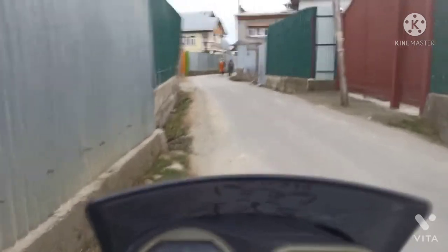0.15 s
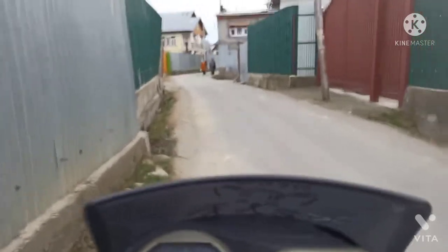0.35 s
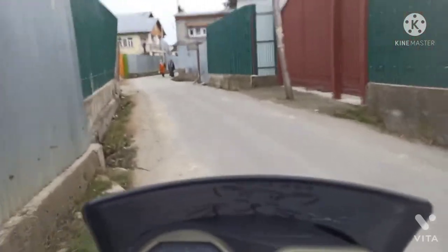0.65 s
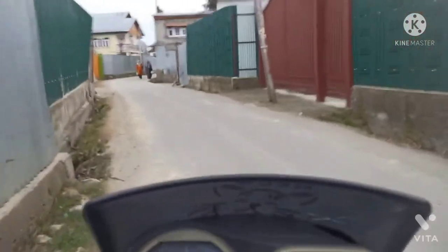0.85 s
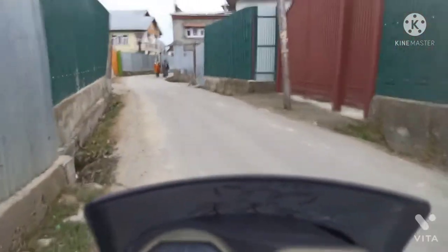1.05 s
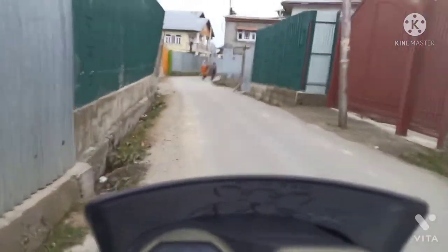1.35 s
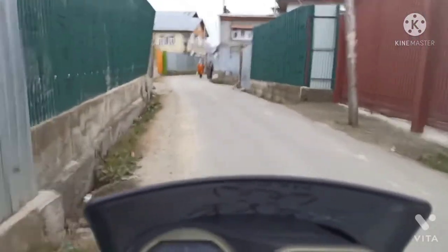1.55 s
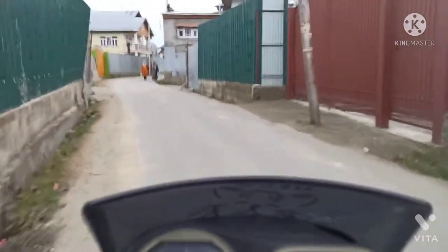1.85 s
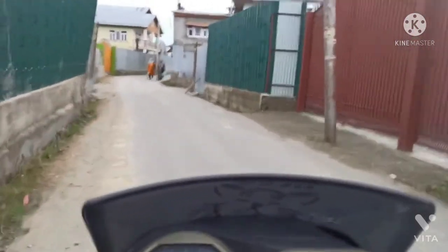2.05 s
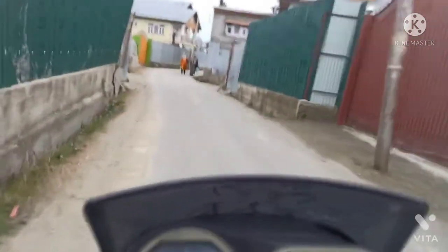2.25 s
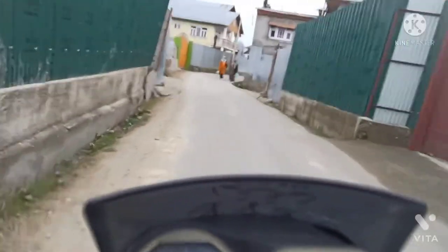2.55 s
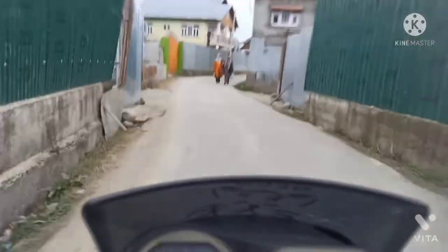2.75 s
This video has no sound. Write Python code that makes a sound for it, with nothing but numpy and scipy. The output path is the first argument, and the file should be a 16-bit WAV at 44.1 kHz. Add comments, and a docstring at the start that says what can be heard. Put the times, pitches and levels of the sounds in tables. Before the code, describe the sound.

A scooter engine starts, heard close from the saddle. Slow putts sound over a soft starter whir for the first half second. The engine picks up unevenly with a few metallic knocks, then revs to a peak around 1.6 seconds with ticking and an airy intake whistle. From about 2 seconds it settles into a steady, thumping putter with buzzing panels, stopping dead at about 2.7 seconds.

```python
"""A single-cylinder scooter engine starts and pulls away, heard from the saddle.
It catches in uneven putts, revs up and settles under load. Each firing thumps the exhaust
and rings the body panels; the intake whistles, gas puffs, valves tick and the casing buzzes.
Underneath, the starter whirs for the first half second. At the end the sound stops dead."""
import sys
import numpy as np
from scipy import signal
from scipy.fft import rfft, irfft, next_fast_len
from scipy.io import wavfile

SR = 44100
rng = np.random.default_rng(int(sys.argv[2]) if len(sys.argv) > 2 else 0)


def materialize(psi):
    """Save the field psi as 16-bit PCM at rate SR to the path in sys.argv[1].

    A 1-D psi becomes a single channel; in a 2-D psi each row is a channel.
    """
    bounded = np.clip(np.atleast_2d(psi).T, -1, 1)
    quanta = np.round(bounded * 32767).astype(np.int16)
    wavfile.write(sys.argv[1], SR, quanta)


N = 127890
TIME = np.arange(N) / SR
CRUISE_RATE = 20   # firings per second
LEAD_PERIODS = 3 / 4   # pressure builds early: resonances start this far ahead of the firing


def exhaust_boom(cycle, rate, force_db):
    """Each firing swells and dies in the silencer's low resonance, higher and tighter at speed."""
    out = np.zeros(N)
    for i in passes(cycle):
        speed = rate[i] / CRUISE_RATE
        hz = 97.9 + 20.2 * speed ** 2.03
        rise_s = 0.012 / speed ** 0.17
        near = slice(max(i - SR // 50, 0), i + SR // 10)
        age = np.maximum(TIME[near] - TIME[i] + LEAD_PERIODS / hz, 0)
        swell = (age / rise_s * np.exp(1 - age / rise_s)) ** 2.86
        out[near] += from_db(force_db[i] - 3.5) * swell * np.sin(2 * np.pi * hz * age)
    return out


def pressure_front(cycle, effort_db, punch_hz=206, punch_s=0.0018, crack_s=0.003):
    """A hard firing bursts out as a steep pressure front: a low punch with a bright crack."""
    punch, crack = np.zeros(N), np.zeros(N)
    for i in passes(cycle):
        near = slice(max(i - SR // 50, 0), i + SR // 50)
        age, gain = TIME[near] - TIME[i], from_db(effort_db[i])
        punch[near] -= gain * bell(age, punch_s) * np.cos(2 * np.pi * punch_hz * age)
        crack[near] += gain * bell(age, crack_s)
    return from_db(-17.5) * punch + from_db(-27.5) * crack * (noise(GAS_EQ) + noise(TICK_EQ))


# Ringing modes of the exhaust pipe and panels: f/Hz, level/dB, t60/s
BODY_MODES = [(165.4, -22, 0.26), (258.8, -17.5, .15), (297, -20.5, 0.044), (386, -23, 0.11),
              (470, -36.5, 0.12), (642.2, -26, 0.13), (879, -29, 0.15), (1240, -38.5, 0.24)]

def body_ring(cycle, throttle_db, spread_db=2.2):
    """The blow of each firing rings the pipe and panels, harder with open throttle."""
    hits, out = passes(cycle), 0
    for hz, db, t60 in BODY_MODES:
        hit_db = db + throttle_db[hits] + spread_db * rng.standard_normal(len(hits))
        onsets = np.maximum(hits - int(LEAD_PERIODS / hz * SR), 0)
        out = out + ring(clicks_at(onsets, hit_db), hz, t60)
    return out


# Colour of the loose panels: f/Hz, level/dB
PANEL_EQ = [(40, -18), (90, -3.5), (200, 5), (380, 3), (550, -4.5), (900, -8.5), (1400, -18.5), (2500, -22),
            (4600, -27), (5100, -26.5), (6600, -19), (7600, -14), (9000, -37)]

def loose_panels(cycle, throttle_db, t60=0.19):
    """Loose panels answer every firing with the same dense, short ring."""
    hits = passes(cycle)
    tail = noise(PANEL_EQ) * from_db(-22.5 - 60 * TIME / t60)
    return signal.fftconvolve(clicks_at(hits, throttle_db[hits]), tail)[:N]


# Intake whistle automation: t/s, f/Hz, level/dB, pulsing/0-1
WHISTLE = [(1.3, 1134, -38.5, 0.23), (1.44, 1110, -37, 0.8), (1.49, 1109, -22, 0.3), (1.65, 1170, -19, 0.3),
           (1.82, 1132, -21, 0.37), (1.98, 950, -19, 0.1), (2.25, 848, -27.5, 0.77),
           (2.64, 913.5, -22, 0.72)]
# Where each gulp of air peaks: t/s, position/cycles after the firing
GULP_TIMING = [(1.9, -.27), (2.35, -0.022)]

def intake(cycle, width_hz=136):
    """A whistle, part clear and part airy, that restarts and bends upward with each gulp of air."""
    hz, db, pulsing = automate(WHISTLE)
    at, = automate(GULP_TIMING)
    gulp = stroke(cycle, at, span=.14, floor=0)
    pitch = hz * (1 + .15 * pulsing * (gulp - .5))
    turns = np.cumsum(pitch) / SR
    gulp_starts = np.diff(np.floor(cycle - at + .5), prepend=0) > 0
    turns -= np.maximum.accumulate(turns * gulp_starts)   # retrigger the phase
    clear = np.sin(2 * np.pi * turns) * np.abs(np.cos(np.pi * (cycle - at)))
    whistle = unit_rms(from_db(5.5) * 2 * pulsing * clear + narrow_noise(pitch, width_hz))
    return from_db(db) * whistle * (1 - pulsing * (1 - gulp))


# Colour of the gas puffs: f/Hz, level/dB
GAS_EQ = [(300, 0.5), (700, 1.5), (1200, -3.5), (1500, -2.5), (2500, -8.5), (3600, -9), (4650, -6.5),
          (5000, -19), (5900, -21.5), (6500, -4), (7600, -17.5), (8400, -16.5), (12000, -15),
          (15500, -16.5)]
# Colour of the frame rumble: f/Hz, level/dB
RUMBLE_EQ = [(25, -25), (50, -2.5), (110, 12.5), (200, 9), (380, -7), (550, -8), (900, -5.5), (1500, -42)]

def gas_and_rumble(cycle, throttle_db, grain_db=3):
    """A gritty puff of gas with each firing, over the rumble of the frame."""
    grit = noise(GAS_EQ) * from_db(-30.5 + grain_db * drift(150))
    puffs = grit * stroke(cycle, at=0.02, span=0.18, floor=0.66)
    rumble = from_db(-19) * noise(RUMBLE_EQ)
    return from_db(throttle_db) * (puffs + rumble)


# Valve ticks: position/cycles after the firing, level/dB at full_rate
VALVE_TICKS = [(-.19, -26), (0.033, -16), (0.302, -21)]
# Hard taps of the valve gear around peak revs: t/s
VALVE_TAPS = [1.586, 1.658, 1.674, 1.695, 1.771, 1.789]
# Colour of the ticks: f/Hz, level/dB
TICK_EQ = [(1500, -10), (4400, -20.5), (5300, -21), (6700, 1.5), (7500, -3.5), (8500, -17), (12000, -13),
           (15500, -7)]

def valves(cycle, rate, full_rate=32.3, spread_db=1.5, decay_s=0.0022):
    """Valves tick brightly at set points of the cycle, louder with speed, with a few hard taps."""
    clicks = clicks_at((np.array(VALVE_TAPS) * SR).astype(int), np.full(len(VALVE_TAPS), -15.5))
    for at, db in VALVE_TICKS:
        hits = passes(cycle, at)
        hit_db = db + 0.7 * (rate[hits] - full_rate) + spread_db * rng.standard_normal(len(hits))
        clicks += clicks_at(hits, hit_db)
    envelope = signal.lfilter([1], [1, -np.exp(-1 / (decay_s * SR))], clicks + 1e-18)
    return envelope * noise(TICK_EQ)


# Knock cues: t/s, level/dB
KNOCK_CUES = [(.736, -0.5), (.893, -1.5), (.968, -1.5), (1.028, 2.5), (1.314, 1), (1.368, 5.5), (1.417, -1),
              (1.462, -0.5)]
# Metallic ring of a knock: f/Hz, level/dB, t60/s
KNOCK_RING = [(490, -29, 0.074), (625, -21.5, 0.055), (1113, -26, 0.063), (1140, -25, 0.014),
              (1276, -45.5, .025)]

def knocks(spread_db=0.97):
    """Sharp knocks ring the metal while the engine picks up."""
    times, cue_db = np.transpose(KNOCK_CUES)
    hits, out = (times * SR).astype(int), 0
    for hz, db, t60 in KNOCK_RING:
        hit_db = cue_db + db + rng.normal(0, spread_db, len(hits))
        out = out + ring(clicks_at(hits, hit_db), hz, t60)
    return out


def casing(cycle, throttle_db):
    """The casing buzzes in two bands on the compression stroke, ahead of each firing."""
    buzz = unit_rms(narrow_noise(hz=479, width_hz=35) + narrow_noise(hz=631.4, width_hz=76))
    compression = stroke(cycle, at=-0.19, span=0.065, floor=0.35)
    return from_db(-26.5 + 0.091 * throttle_db) * buzz * compression


def crank(cycle, rate):
    """The crank turns twice per firing and shakes the frame at high speed."""
    return from_db(-43 + 2.35 * (rate - CRUISE_RATE)) * np.sin(2 * np.pi * 2 * cycle)


# A singing panel: t/s, f/Hz, level/dB, half length/s
PANEL_NOTE = (1.36, 482, -21, 0.02)

def panel_note():
    """One panel's note briefly swells and fades."""
    peak_s, hz, db, span = PANEL_NOTE
    return from_db(db) * bell(TIME - peak_s, span) * np.sin(2 * np.pi * hz * TIME)


# Clink of a loose part: t/s, f/Hz, level/dB, t60/s
CLINK_CUE = (1.328, 3630, -30, .08)

def clink():
    """A loose part rings once as the throttle opens."""
    start_s, hz, db, t60 = CLINK_CUE
    return ring(clicks_at([int(start_s * SR)], [db]), hz, t60)


# Starter motor fader: t/s, level/dB
STARTER_FADER = [(0, -31), (.3, -33.5), (.45, -34.5), (.54, -43), (.62, -55)]
# Colour of its rasp: f/Hz, level/dB
STARTER_EQ = [(200, -5), (600, -7.5), (950, -6), (1350, 1), (1700, -10.5), (2500, -19.5), (4400, -16),
              (5000, -23.5), (5900, -24.5), (6200, -11), (6680, 0), (6900, -22), (7300, -10), (8000, -25.5),
              (15000, -24)]

def starter(grain_db=2.5):
    """Gears and brushes rasp, fading as the engine catches."""
    db, = automate(STARTER_FADER)
    return from_db(db + grain_db * drift(250)) * noise(STARTER_EQ)


def cowl(hiss, t60=0.049):
    """Hiss bounces about inside the engine cover and gains a short tail."""
    tail = rng.standard_normal(N) * from_db(-23.5 - 60 * TIME / t60)
    return hiss + signal.fftconvolve(hiss, tail)[:N]


def from_db(db):
    """Decibels to gain."""
    return 10 ** (np.asarray(db) / 20)


def unit_rms(x):
    """Scale to unit rms."""
    return x / np.sqrt(np.mean(x ** 2) + 1e-20)


def automate(rows):
    """One automation curve for each column after the time."""
    times, *columns = np.transpose(rows)
    return [np.interp(TIME, times, column) for column in columns]


def equalise(x, eq):
    """Filter through a curve of f/Hz, level/dB points."""
    hz, db = np.transpose(eq)
    size = next_fast_len(N + 4096)
    bin_hz = np.maximum(np.arange(size // 2 + 1) * SR / size, 1)
    gain = from_db(np.interp(np.log(bin_hz), np.log(hz), db))
    return irfft(rfft(x, size) * gain, size)[:N]


def noise(eq):
    """Coloured noise at unit rms."""
    return unit_rms(equalise(rng.standard_normal(N), eq))


def drift(rate_hz):
    """Smooth random modulation at unit rms."""
    lowpass = signal.butter(2, rate_hz, fs=SR, output="sos")
    return unit_rms(signal.sosfilt(lowpass, rng.standard_normal(N + SR))[SR:])


def narrow_noise(hz, width_hz):
    """A resonance stirred by turbulence; its centre may move."""
    angle = 2 * np.pi * np.cumsum(hz * np.ones(N)) / SR
    return unit_rms(drift(width_hz / 2) * np.cos(angle) + drift(width_hz / 2) * np.sin(angle))


def ring(clicks, hz, t60):
    """Each click triggers a decaying sine of its own height."""
    r, w = from_db(-60 / (t60 * SR)), 2 * np.pi * hz / SR
    return signal.lfilter([0, np.sin(w)], [1, -2 * r * np.cos(w), r * r], clicks + 1e-18)


def passes(cycle, at=0):
    """Samples at which the engine passes a point of its cycle; 0 is the firing."""
    return np.flatnonzero(np.diff(np.floor(cycle - at)) > 0)


def clicks_at(samples, db):
    """A click train with the given levels."""
    return np.bincount(samples, from_db(db), N)


def bell(offset, span):
    """A Gaussian swell of height 1."""
    return np.exp(-.5 * (offset / span) ** 2)


def stroke(cycle, at, span, floor):
    """One swell per cycle, falling back to a floor; at and span are in cycles."""
    offset = (cycle - at + .5) % 1 - .5
    return floor + (1 - floor) * bell(offset, span)


# Engine revs: t/s, rate/firings per second
REVS = [(0.0, 8.34), (0.259, 8.19), (0.561, 9.04), (0.62, 11.39), (0.713, 9.2), (0.793, 14.15),
        (0.9, 11.51), (1.061, 18.79), (1.23, 18.95), (1.27, 13.48), (1.456, 22.92), (1.598, 28.32),
        (1.898, 23.7), (2.173, 19.15), (2.65, 20.35)]
# Weight of the firings: t/s, level/dB
FIRING_FORCE = [(.09, -8), (.21, -5), (.34, -9), (.45, -7), (.565, -2), (.66, -5), (.758, -1.5),
                (.914, -3.5), (.986, 0), (1.1, 0.5), (1.152, -10.5), (1.205, -3.5), (1.262, -10), (1.33, 1),
                (1.56, -5.5), (1.8, -4.5), (2, -1), (2.64, -2.5)]
# Throttle, as a fader on gas and mechanical noise: t/s, level/dB
THROTTLE_FADER = [(0, -16), (.56, -9.5), (.7, -11.5), (.76, -4.5), (.9, -10), (.99, -1.5), (1.1, -4),
                  (1.15, -4), (1.27, -9), (1.34, -2.5), (1.46, 1.5), (1.62, 1.5), (1.8, 2.5), (2.05, 0),
                  (2.3, 0.5), (2.64, 0.5)]

def scene():
    """The revs set the engine cycle that triggers the repeating layers; all mix to mono."""
    rate, = automate(REVS)
    force_db, = automate(FIRING_FORCE)
    throttle_db, = automate(THROTTLE_FADER)
    cycle = .22 + np.cumsum(rate) / SR   # a firing at each whole number
    thumps = exhaust_boom(cycle, rate, force_db) + pressure_front(cycle, force_db + throttle_db)
    shake = body_ring(cycle, throttle_db) + loose_panels(cycle, throttle_db) + crank(cycle, rate)
    clatter = casing(cycle, throttle_db) + valves(cycle, rate) + knocks() + panel_note() + clink()
    air = intake(cycle) + cowl(gas_and_rumble(cycle, throttle_db) + starter())
    return (thumps + shake + clatter + air)[None]


# Microphone colour: f/Hz, level/dB
MIC_EQ = [(20, -16.5), (60, 0), (8350, -1.5), (8750, -16.5), (10200, -25.5), (11300, -34.5), (11650, -14),
          (16000, -13)]

def record(dry, ceiling=.95, end_s=2.652, fade_s=0.0013, stopband_hz=16200):
    """Microphone colour, soft-clipped peaks, a dead stop and a steep high cut."""
    x = equalise(dry[0], MIC_EQ)
    x = x / (1 + (x / ceiling) ** 8) ** (1 / 8)
    x = x * np.clip((end_s - TIME) / fade_s, 0, 1)
    high_cut = signal.cheby2(16, 70, stopband_hz, fs=SR, output="sos")
    return signal.sosfilt(high_cut, x + 1e-18)[None]


dry = scene()
out = record(dry)
materialize(out)
```